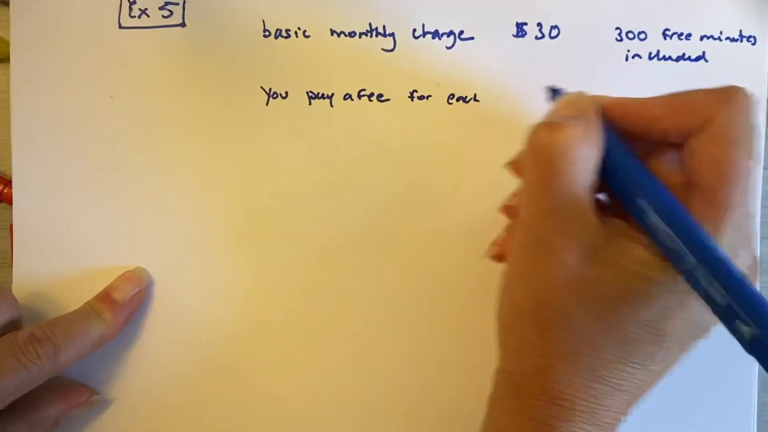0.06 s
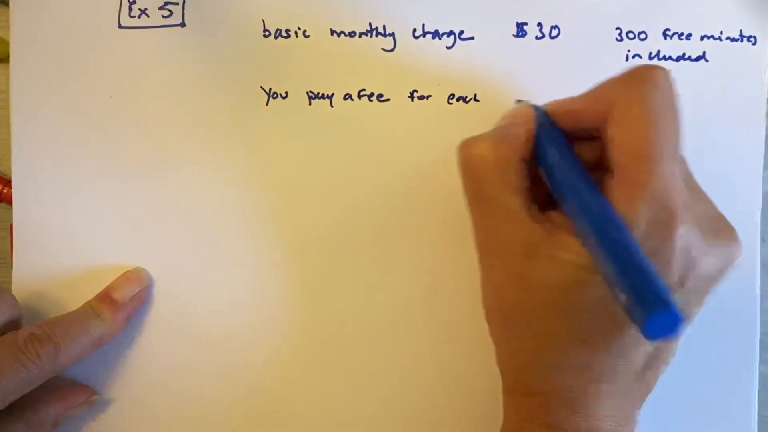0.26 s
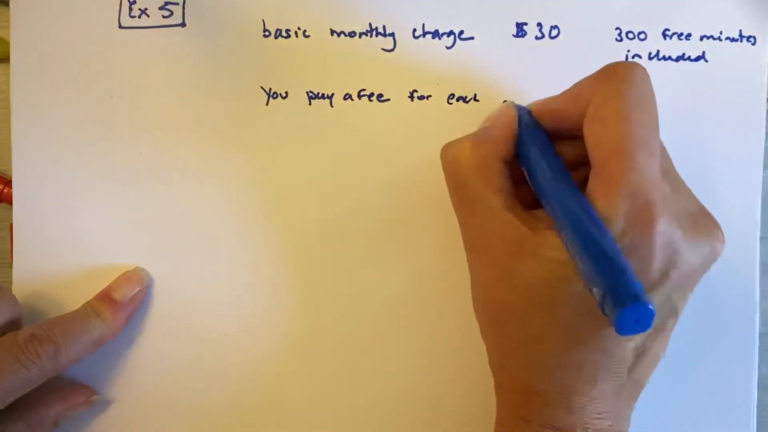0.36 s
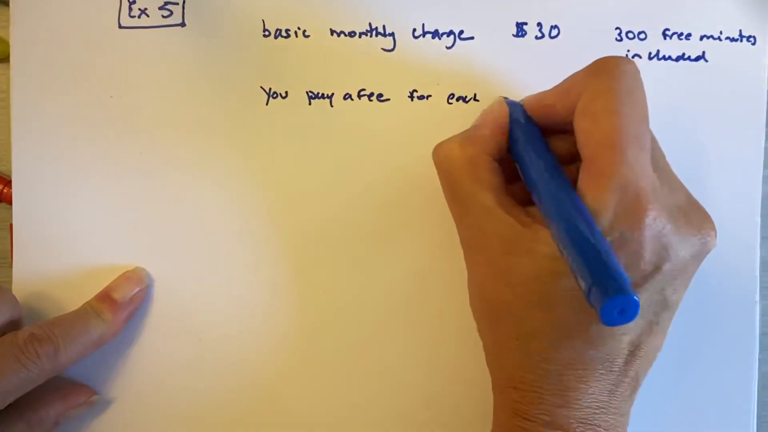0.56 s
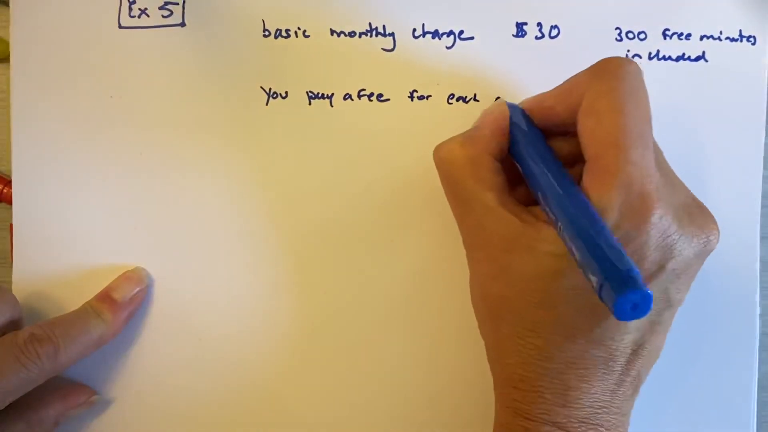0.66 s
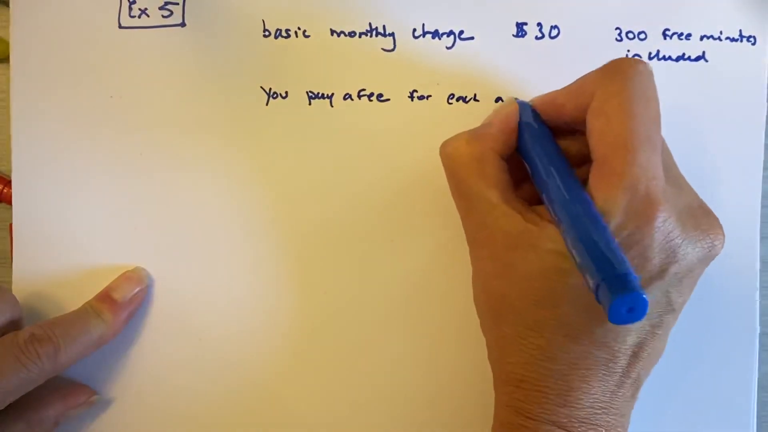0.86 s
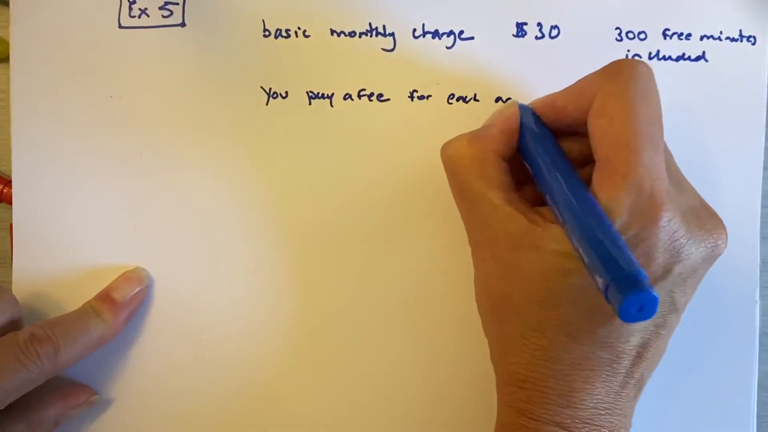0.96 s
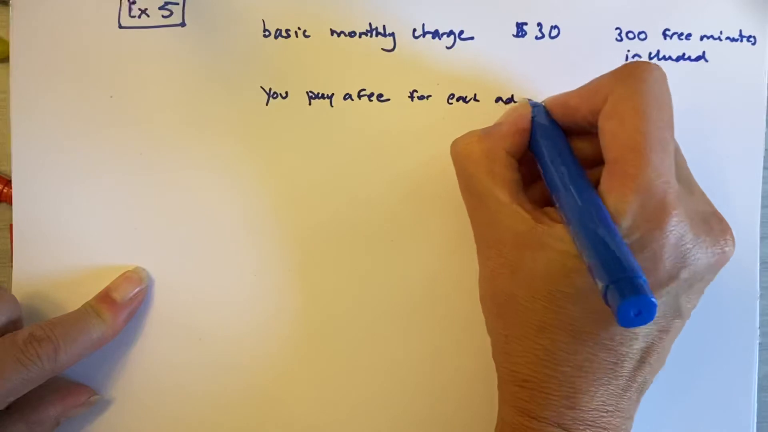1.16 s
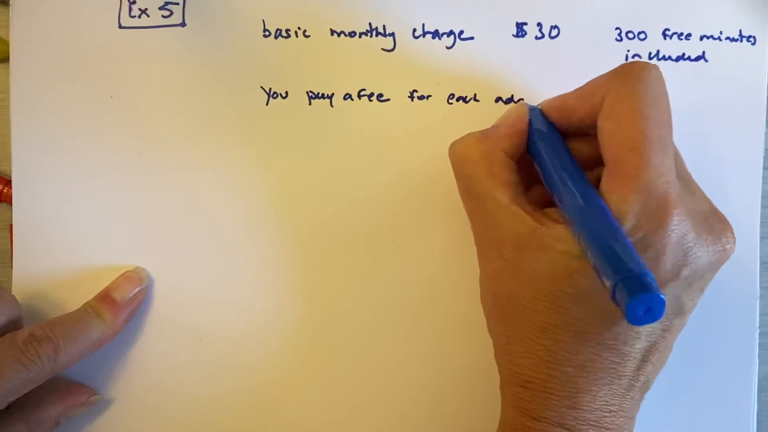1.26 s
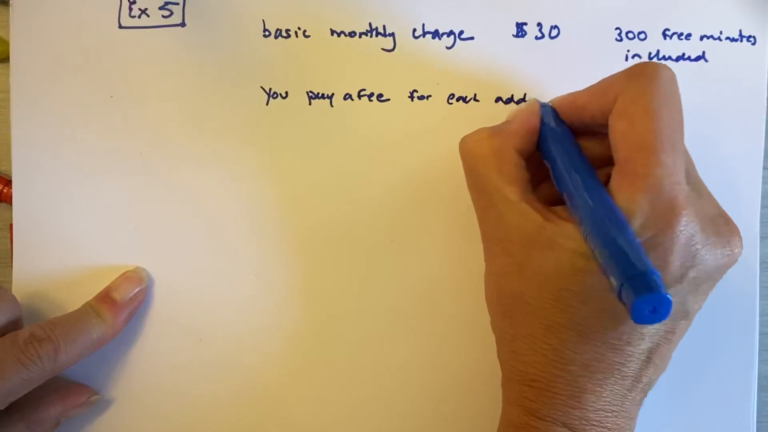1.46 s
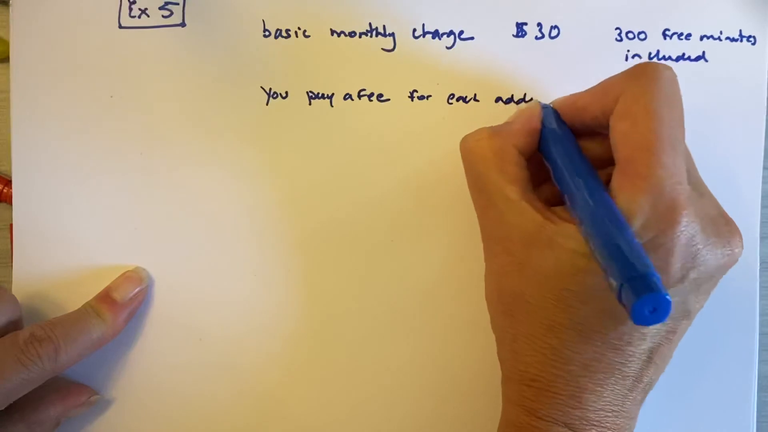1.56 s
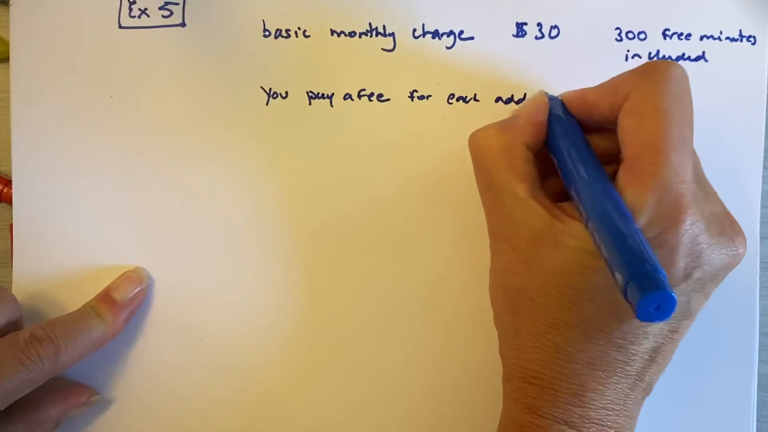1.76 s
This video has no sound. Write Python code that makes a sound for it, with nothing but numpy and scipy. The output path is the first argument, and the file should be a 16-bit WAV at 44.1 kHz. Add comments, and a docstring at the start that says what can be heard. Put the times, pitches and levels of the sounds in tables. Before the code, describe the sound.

A felt-tip marker scratches on paper, close up: a brief stroke, then the hand bumps and drags over the desk with a knock and small rattle, then quick dry strokes with light nib taps in a quiet room.

```python
"""Felt-tip marker at a desk

A marker writes on paper at a wooden desk, close under a two-port microphone. Fibre catches through
resonances make the scratch of the strokes; noise and a wavering sine shake the pad; short pushes
into decaying modes make nib taps and hand thumps. The hand drags over the desk, brushes the sheet
and ticks; the barrel rattles after a knock. Shaped noise, rumble and a faint whine fill the room.
"""
import sys
import numpy as np
from scipy import signal
from scipy.fft import rfft, irfft
from scipy.io import wavfile
from scipy.ndimage import uniform_filter1d

SR = 44100
rng = np.random.default_rng(int(sys.argv[2]) if len(sys.argv) > 2 else 0)


def makeup_ratio(level_db):
    """Linear amplitude ratio for a level in decibels (20 dB per factor of ten)."""
    decades = np.asarray(level_db, float) / 20
    return 10 ** decades


def master_out(mix):
    """Clip the mix to full scale and print it as 16-bit PCM to the path in sys.argv[1]."""
    frames = np.transpose(np.atleast_2d(mix))
    ceiling = np.clip(frames, -1, 1)
    pcm = np.round(ceiling * 32767).astype(np.int16)
    wavfile.write(sys.argv[1], SR, pcm)


N = 79380

# room noise spectrum, relative: (frequency [Hz], density [dB per Hz])
ROOM_SPECTRUM = [(30, -43.5), (55, -11), (130, -4), (270, -9), (600, -29.5), (1000, -33.5), (2500, -39.5),
                 (5000, -47), (7000, -27), (9000, -49.5), (15000, -57.5)]
# low rumble through the desk: (time [s], level [dB])
RUMBLE_LEVEL = [(0.0, -60), (0.244, -63), (0.29, -67), (0.486, -60), (0.51, -70), (0.596, -66.5),
                (0.862, -64), (0.886, -62), (0.972, -79), (1.006, -62), (1.494, -67.5), (1.528, -68),
                (1.59, -65.5), (1.64, -79), (1.8, -70.5)]
# faint tone in the room: (time [s], mean level [dB])
WHINE_LEVEL = [(0, -98), (1.55, -90), (1.8, -91)]
# desk top modes: (frequency [Hz], relative level [dB], t60 [s])
DESK_MODES = [(108.4, -6, 0.39), (145, 2, 0.18), (164.7, 5.5, 0.36), (244.3, 1.5, 0.3), (339.7, -2, 0.1),
              (429.5, -6, 0.092), (490, -7, 0.14), (634, -10.5, 0.07), (688, -17, 0.22), (757, -9.5, 0.11),
              (887, -12.5, 0.05), (1000, -17.5, 0.26), (1150, -14, 0.077)]
# duller desk modes, hand resting on it: (frequency [Hz], relative level [dB], t60 [s])
DULL_DESK_MODES = [(112, -9.5, 0.066), (201, 3.5, 0.047), (328.4, 5, 0.068), (412.7, 1, 0.086),
                   (464.4, -6, 0.067), (526, -7.5, 0.065), (720, -16.5, 0.082), (846, -11.5, 0.04)]
# hand dragging over the desk, one list per span: (time [s], drive level before trim [dB])
DRAG_SPANS = [
    [(0.17, -85), (0.178, -69), (0.202, -59), (0.255, -47.5), (0.296, -66), (0.31, -55.5)],
    [(0.36, -45), (0.372, -63), (0.402, -58), (0.428, -54), (0.446, -59), (0.49, -83)],
    [(0.56, -91), (0.582, -55), (0.598, -54), (0.648, -68.5), (0.686, -61.5), (0.734, -97)],
    [(1.06, -69), (1.078, -64), (1.096, -63), (1.13, -64), (1.16, -67), (1.176, -85), (1.224, -96),
     (1.266, -66.5), (1.294, -67), (1.33, -76)],
]
# hand thumps: (time [s], push level [dB], contact [s], ring before damping [s])
THUMPS = [(0.061, -45, 0.0046, 0.13), (.211, -35.5, 0.0039, 0.136), (0.25, -44, 0.0022, 0.12),
          (0.276, -41.5, 0.0097, 0.085), (.319, -29.5, 0.0014, 0.11), (0.323, -44.5, 0.0015, 0.146),
          (0.623, -43.5, 0.0062, 0.26)]
# ticks of skin or nib meeting the paper: (time [s], onset level [dB])
TICKS = [(0.192, -63), (0.3187, -61.5), (0.848, -74), (1.252, -67.5), (1.561, -65.5), (1.743, -77),
         (1.766, -71)]
# side of the hand brushing the sheet: (time [s], level [dB], tilt [dB per octave])
BRUSH_STROKES = [(0.125, -93, -4), (0.135, -72.5, 3.5), (0.17, -71.5, 4.5), (0.185, -76.5, -4.5),
                 (0.195, -63, 3.5), (0.241, -72, -1), (0.249, -66, -2), (0.313, -80, -6), (0.315, -81, -1)]
# resonances of skin on the sheet: (frequency [Hz], width [Hz], relative level [dB])
SKIN_PEAKS = [(1360, 190, 1.5), (2110, 320, 0), (2420, 520, 0.5), (3520, 2100, -3.5), (6030, 1300, -1),
              (9800, 6900, -33)]
# pad modes under the nib: (frequency [Hz], relative level [dB], t60 [s])
PAD_MODES = [(103.2, -11, 0.23), (196, -22, 0.033), (264, -18, 0.087), (312, 4.5, 0.071), (347.8, -7, 0.13),
             (427, -7, 0.096), (530, -26, 0.052)]
# nib shaking the pad, one list per span: (time [s], drive level before trim [dB])
SHAKE_SPANS = [
    [(0.0, -55), (0.032, -79.5), (0.06, -49.5)],
    [(0.52, -86), (0.556, -58), (0.568, -52), (0.65, -60.5), (0.706, -54), (0.758, -60.5), (0.782, -48.5),
     (0.846, -62), (0.88, -48.5), (0.938, -50), (0.97, -56.5), (0.996, -53.5), (1.01, -57), (1.042, -85),
     (1.064, -53), (1.11, -58), (1.168, -62.5), (1.224, -52.5), (1.286, -53.5), (1.342, -101), (1.374, -63),
     (1.416, -53.5), (1.43, -50), (1.484, -54), (1.542, -71), (1.57, -54.5), (1.588, -67), (1.62, -95)],
    [(1.75, -86), (1.774, -76), (1.8, -56.5)],
]
# mean judder pitch of the nib on the pad: (time [s], frequency [Hz])
JUDDER_PITCH = [(0.599, 325), (0.731, 299.6), (0.8, 312.4), (0.929, 319.4), (0.978, 289.2), (1.06, 304.4),
                (1.131, 329.5), (1.28, 306.2), (1.39, 287), (1.44, 320)]
# nib taps: (time [s], push level [dB], contact [s])
TAPS = [(0.592, -51, 0.00049), (0.611, -68, 0.0005), (1, -49.5, 0.00083), (1.111, -45, 0.0021),
        (1.434, -41, 0.0022), (1.566, -50, 0.00074)]
# barrel rattle after the knock: (frequency [Hz], width [Hz], onset level [dB], t60 [s])
RATTLE_BANDS = [(700, 100, -57, 0.05), (1300, 690, -65.5, 0.26), (2115, 240, -64.5, 0.23),
                (2650, 660, -76.5, .1), (3870, 330, -67.5, 0.061), (6280, 230, -68.5, 0.37)]
# felt strokes, quick ones brighter, one list per span:
# (time [s], level before trim [dB], tilt [dB per octave])
STROKES = [
    [(0.0, -72.5, 1), (0.03, -70, 1), (0.06, -67.5, 3.5), (0.125, -96, 10)],
    [(0.51, -110, 20), (0.524, -72, -3), (0.56, -68, -4)],
    [(0.56, -69.5, -1.5), (0.6, -61, 1), (0.635, -78.5, -3)],
    [(0.635, -85, -11), (0.653, -59, 3.5), (0.669, -58.5, 3.5), (0.701, -74.5, -2), (0.723, -64.5, -0.5),
     (0.767, -63, -2), (0.805, -66.5, 0.5), (0.855, -60.5, -0.5), (0.909, -64.5, 1.5), (0.923, -70.5, -3),
     (0.943, -59.5, 3.5), (0.999, -67, -1.5), (1.03, -84, 0.5)],
    [(1.03, -69.5, -0.5), (1.06, -61.5, -1.5), (1.092, -58, -1), (1.15, -73, 0), (1.205, -61.5, 0.5),
     (1.234, -73.5, -2.5), (1.254, -60.5, 2), (1.326, -84, -3)],
    [(1.335, -85, 4), (1.361, -67, 1), (1.389, -60, -2), (1.409, -64.5, -2), (1.437, -60, 1.5),
     (1.462, -76, 1.5), (1.49, -85, -1)],
    [(1.493, -95, 0), (1.519, -70, 0), (1.567, -75.5, -1), (1.6, -99, -1)],
    [(1.775, -77, -2), (1.789, -63, -2), (1.8, -63, -1)],
]
# resonances of nib, barrel and sheet: (frequency [Hz], width [Hz], relative level [dB])
SCRATCH_PEAKS = [(927, 360, -4), (1397, 56, 3), (1699, 118, 4), (2805, 138, 1), (3327, 104, 0.5),
                 (3725, 194, 2), (4380, 554, 3), (5660, 1340, -0.5), (6610, 1730, -1.5), (8810, 1110, -9.5),
                 (10890, 430, -12.5), (12900, 650, -24), (14350, 1100, -21)]
# phase between the two ports: (frequency [Hz], left lead [rad])
PORT_LEAD = [(0, 0), (1460, -.2), (3530, .3), (4310, .8), (5080, .1), (6800, 2.7), (7050, 3.14),
             (7550, 3.14), (8100, 3.6), (9730, 6.2), (11600, 6.6), (12500, 9.2), (14400, 9.6),
             (15700, 12.5)]
# unlikeness of the ports: (frequency [Hz], share unrelated [ratio])
PORT_UNLIKE = [(60, 0.028), (600, 0.36), (3000, 0.35), (7000, 0.057), (8000, 0.09), (15000, 1)]

ROOM_DB, ROOM_WALK_DB, WHINE_HZ = -67, 1, 2350
FIBRES_PER_S, FIBRE_SPREAD_DB = 20000, 1.5
GRIT_DB = 1  # fast unevenness of the paper grain
FLICKER_DB, FLICKER_PER_S = 1.5, 41
DAMP_S, THUMP_ROUGH_DB, TICK_S = 0.012, 1, 0.0022  # DAMP_S, TICK_S: time to 1/e
JUDDER_DB, NOISY_DB = -2, -32
KNOCK_S = 0.3185
LOW_CUT_HZ, TOP_HZ = 27.6, 15300  # both -6 dB
CAPSULE_HZ, CAPSULE_WIDTH_HZ, CAPSULE_DB = 7520, 610, 9.5  # resonant path re direct path


def curve(rows):
    """Gain over time from (s, dB) rows, -150 dB outside."""
    rows = np.array(rows)
    return makeup_ratio(np.interp(np.arange(N) / SR, rows[:, 0], rows[:, 1], left=-150, right=-150))


def joined(spans):
    """Gain over several spans, the largest at each instant."""
    return np.max([curve(rows) for rows in spans], axis=0)


def shape(x, gain):
    """Multiply the spectrum by gain(Hz)."""
    return irfft(rfft(x) * gain(np.arange(N // 2 + 1) * SR / N + 0.0014), N)


def table(rows, hz):
    """Read (Hz, value) points on a log axis."""
    rows = np.array(rows)
    return np.interp(np.log(hz), np.log(rows[:, 0] + 1), rows[:, 1])


def unit(x):
    """Scale to rms 1."""
    return x / np.sqrt(np.mean(x ** 2))


def walk(rate_per_s):
    """Smooth random wander, rms 1."""
    k = int(SR / rate_per_s)
    return unit(uniform_filter1d(uniform_filter1d(rng.standard_normal(N), k), k))


def band(x, centre_hz, width_hz):
    """One second-order resonance, unity gain at its centre."""
    return shape(x, lambda hz: 1j * hz * width_hz / (centre_hz ** 2 - hz * hz + 1j * hz * width_hz))


def ring(x, modes):
    """Drive a set of decaying modes, neighbours in opposite sense."""
    out = np.zeros(len(x))
    for k, (hz, db, t60_s) in enumerate(modes):
        pole = np.exp(2j * np.pi * hz / SR - np.log(1000) / (t60_s * SR))
        out += (-1) ** k * makeup_ratio(db) * signal.lfilter([1], [1, -pole], x).imag
    return out


def blow(start_s, db, contact_s, modes):
    """Smooth unit-area push of given contact time into the modes."""
    t = np.arange(N) / SR - start_s
    touching = (t > 0) & (t < contact_s)
    push = np.where(touching, np.sin(np.pi * t / contact_s) ** 2, 0) * 2 / (contact_s * SR)
    return makeup_ratio(db) * ring(push, modes)


def fibres():
    """Dense uneven catches on paper: random impulses, rms 1."""
    hit = rng.random(N) < FIBRES_PER_S / SR
    return unit(hit * rng.standard_normal(N) * makeup_ratio(FIBRE_SPREAD_DB * rng.exponential(size=N)))


def rustle(peaks, rows):
    """Fibre catches through separately flickering resonances, tilted about 4 kHz over time."""
    rows = np.array(rows)
    catches = fibres() * makeup_ratio(GRIT_DB * walk(230))
    tilt_db = np.interp(np.arange(N) / SR, rows[:, 0], rows[:, 2])
    flat, tilted = np.zeros(N), np.zeros(N)
    for k, (hz, width_hz, db) in enumerate(peaks):
        flicker = makeup_ratio(db + FLICKER_DB * walk(FLICKER_PER_S))
        resonance = (-1) ** k * flicker * band(catches, hz, width_hz)
        flat += resonance
        tilted += resonance * makeup_ratio(tilt_db * np.log2(hz / 4000))
    return tilted / np.sqrt(np.mean(flat ** 2))


def room():
    """Room hum and hiss: shaped noise with a slightly wandering level."""
    noise = unit(shape(rng.standard_normal(N), lambda hz: makeup_ratio(table(ROOM_SPECTRUM, hz))))
    return noise * makeup_ratio(ROOM_DB + ROOM_WALK_DB * walk(17))


def rumble():
    """Low rumble: noise through three equal resonances in series."""
    noise = rng.standard_normal(N)
    for _ in range(3):
        noise = band(noise, 70, 130)
    return unit(noise) * curve(RUMBLE_LEVEL)


def whine():
    """Faint tone: a sine wandering in phase and level."""
    phase = 2 * np.pi * WHINE_HZ * np.arange(N) / SR + 0.6 * walk(30)
    return curve(WHINE_LEVEL) * np.sin(phase) * makeup_ratio(3.7 * walk(18))


def drag():
    """Hand sliding: smoothed catches drive the desk modes dulled by the hand."""
    catches = uniform_filter1d(fibres(), size=36)
    return ring(catches * joined(DRAG_SPANS), DULL_DESK_MODES) * makeup_ratio(-22)


def brush():
    """Side of the hand on the sheet: fibre catches through skin resonances."""
    return rustle(SKIN_PEAKS, BRUSH_STROKES) * curve(BRUSH_STROKES)


def thumps():
    """Hand pushes ring the desk; the moving hand wavers the ring, then damps it."""
    t = np.arange(N) / SR
    out = np.zeros(N)
    for start_s, db, contact_s, rings_s in THUMPS:
        damping = np.exp(-np.clip(t - start_s - rings_s, 0, None) / DAMP_S)
        out += blow(start_s, db, contact_s, DESK_MODES) * damping * makeup_ratio(THUMP_ROUGH_DB * walk(59))
    return out


def ticks():
    """Skin or nib meeting paper: decaying bursts of band-limited noise."""
    t = np.arange(N) / SR
    env = sum(makeup_ratio(db) * (t > s) * np.exp(-abs(t - s) / TICK_S) for s, db in TICKS)
    noise = shape(rng.standard_normal(N), lambda hz: hz / (1500 + hz) / (1 + (hz / 6500) ** 4))
    return env * unit(noise)


def rattle():
    """Barrel rattle after the knock: noise bands, each with its own decay."""
    t = np.arange(N) / SR - KNOCK_S
    out = np.zeros(N)
    for hz, width_hz, db, t60_s in RATTLE_BANDS:
        noise = unit(band(rng.standard_normal(N), hz, width_hz))
        out += noise * makeup_ratio(db - 60 * abs(t) / t60_s) * (t > 0)
    return out


def taps():
    """Nib taps: short pushes into the pad modes."""
    return sum(blow(s, db, contact_s, PAD_MODES) for s, db, contact_s in TAPS)


def shake():
    """Noisy pad shaking: fibre catches drive the pad modes."""
    return ring(fibres() * joined(SHAKE_SPANS), PAD_MODES) * makeup_ratio(NOISY_DB)


def judder():
    """Nib stick-slip near the pad's main mode, as a sine wavering in pitch and level."""
    rows = np.array(JUDDER_PITCH)
    hz = np.interp(np.arange(N) / SR, rows[:, 0], rows[:, 1]) * (1 + 0.023 * walk(41.3))
    hum = np.sin(2 * np.pi * np.cumsum(hz) / SR) * makeup_ratio(JUDDER_DB + 2 * walk(45))
    return hum * uniform_filter1d(joined(SHAKE_SPANS), size=400)


def scratch():
    """Felt strokes: fibre catches through resonances of nib, barrel and sheet."""
    return rustle(SCRATCH_PEAKS, np.concatenate(STROKES)) * joined(STROKES) * makeup_ratio(-0.5)


def two_ports(near):
    """Both ports hear the mix, shifted in phase and made slightly unlike by a noise tail."""
    rows = np.array(PORT_LEAD)
    lead = lambda hz: np.exp(0.5j * np.interp(hz, rows[:, 0], rows[:, 1]))  # half the lead per port
    tail = rng.standard_normal(N) * np.exp(-np.arange(N) / SR / 0.016)
    tail = rfft(tail / np.sqrt(np.sum(tail ** 2)))
    side = shape(near, lambda hz: 1j * tail.real * np.clip(table(PORT_UNLIKE, hz), 0, 1))
    return np.array([shape(near + side, lead), shape(near - side, lambda hz: 1 / lead(hz))])


def scene():
    """Low-cut hand and marker over the room, at two ports."""
    background = room() + rumble() + whine()
    hand = drag() + brush() + thumps() + ticks()
    marker = rattle() + taps() + shake() + judder() + scratch()
    low_cut = lambda hz: (1j * hz / LOW_CUT_HZ) ** 2 / (1 + 1j * hz / LOW_CUT_HZ) ** 2
    return two_ports(background + shape(hand + marker, low_cut))


def band_limit(x):
    """A steep low-pass at the top of the band."""
    return signal.sosfilt(signal.butter(12, 16070, fs=SR, output="sos"), x)


def record(dry):
    """Microphone: port resonance beside the direct path, then a steep top cut."""
    def mic(hz):
        resonance = makeup_ratio(CAPSULE_DB) / (1 + 2j * (hz - CAPSULE_HZ) / CAPSULE_WIDTH_HZ)
        return (1 + resonance) / (1 + (hz / TOP_HZ) ** 60)
    mix = np.array([shape(port, mic) for port in dry])
    return band_limit(mix)


dry = scene()
out = record(dry)
master_out(out)
```